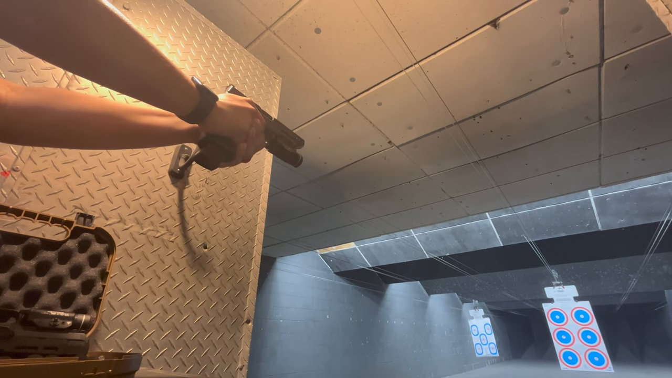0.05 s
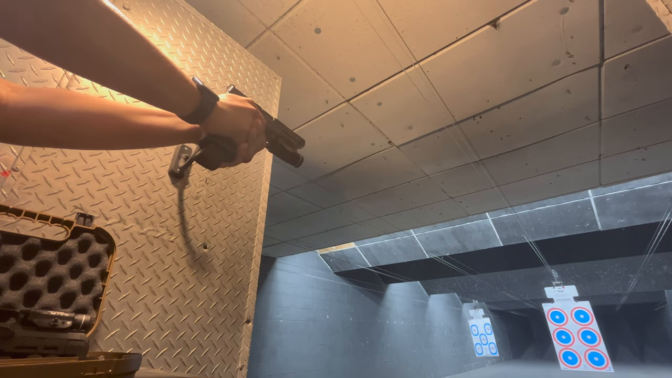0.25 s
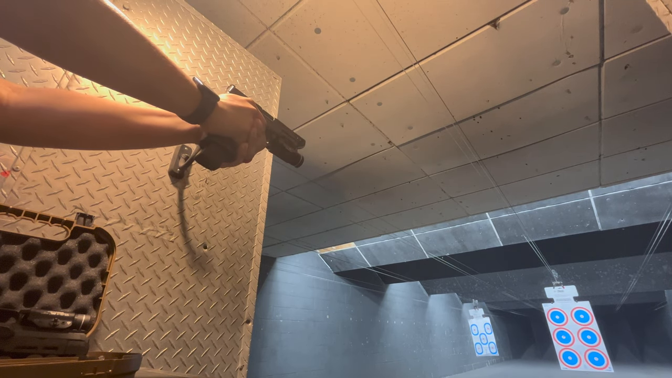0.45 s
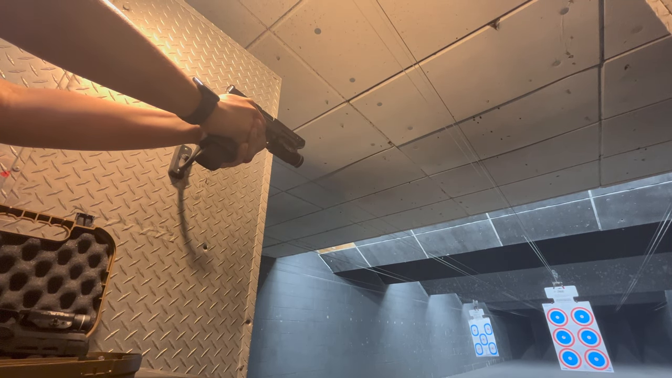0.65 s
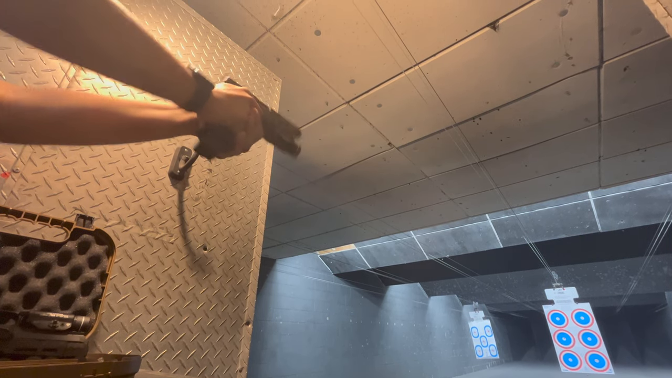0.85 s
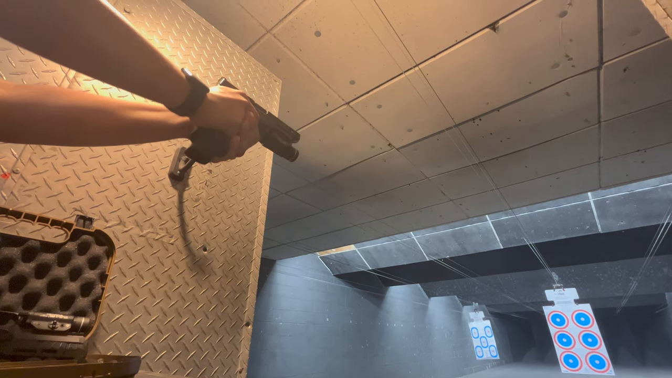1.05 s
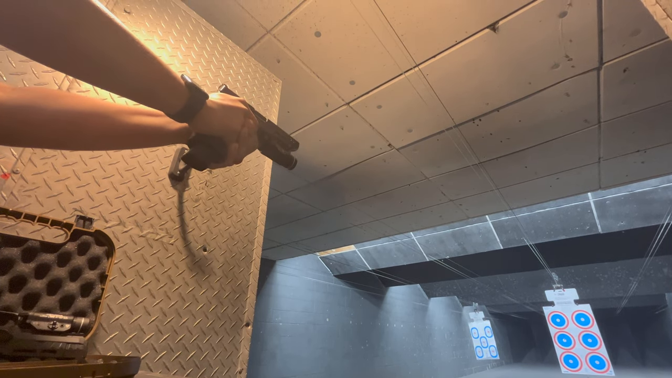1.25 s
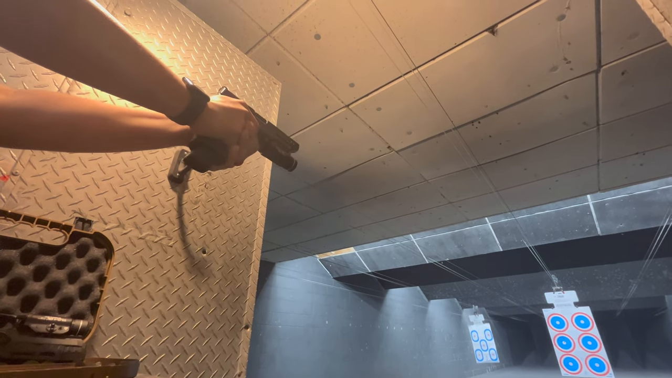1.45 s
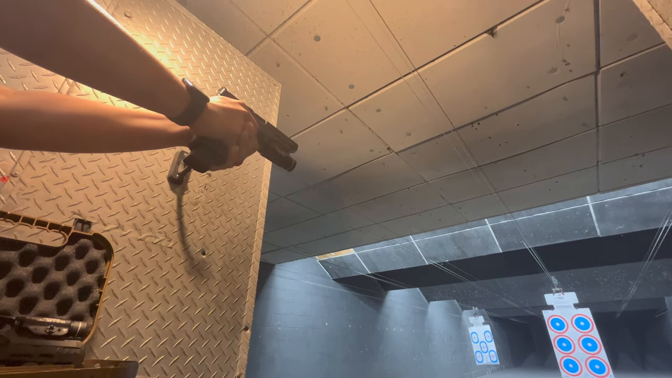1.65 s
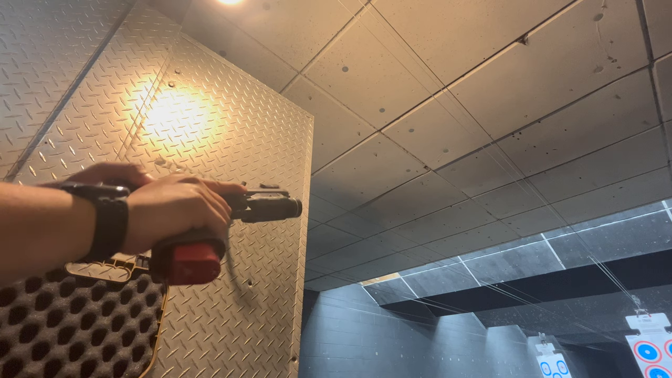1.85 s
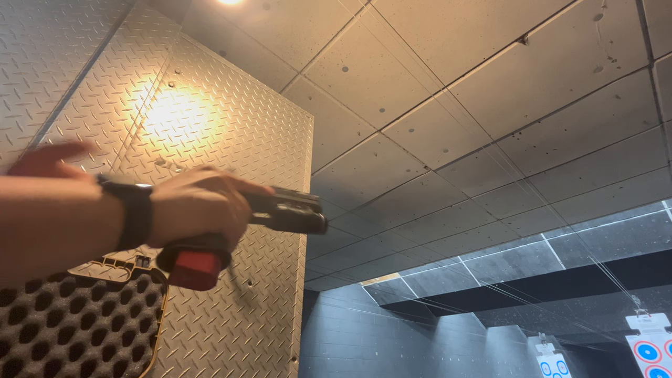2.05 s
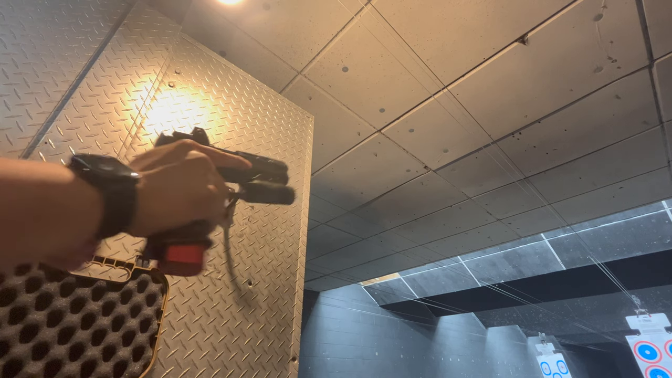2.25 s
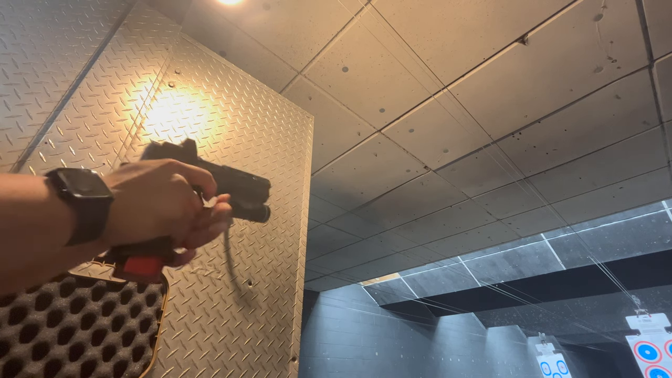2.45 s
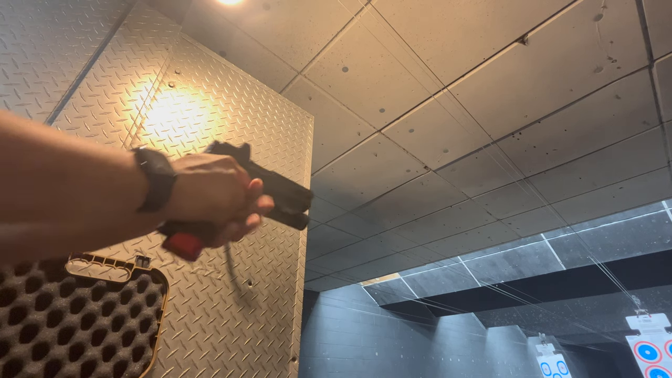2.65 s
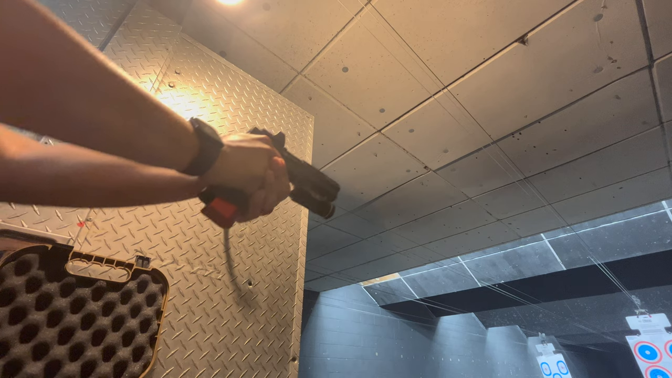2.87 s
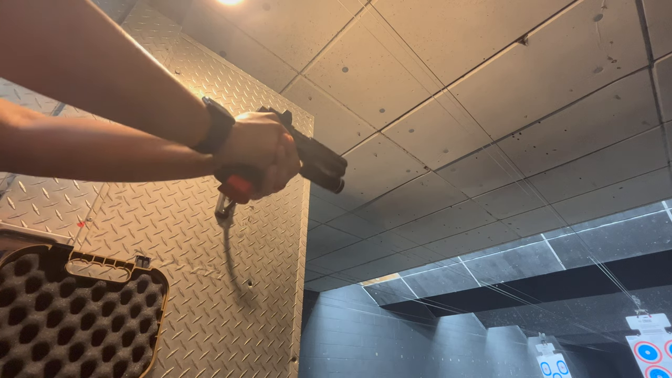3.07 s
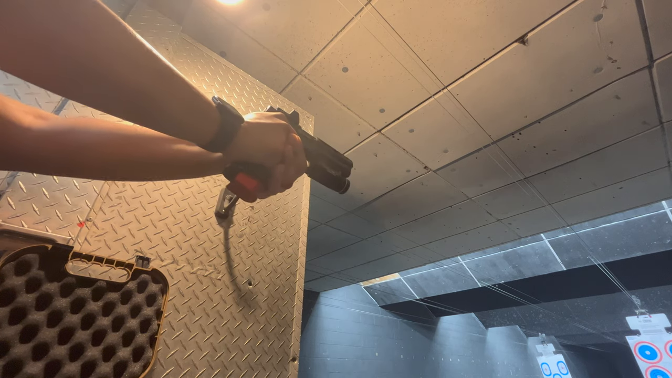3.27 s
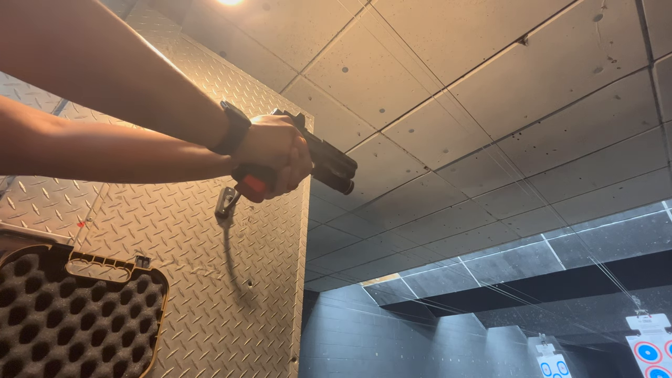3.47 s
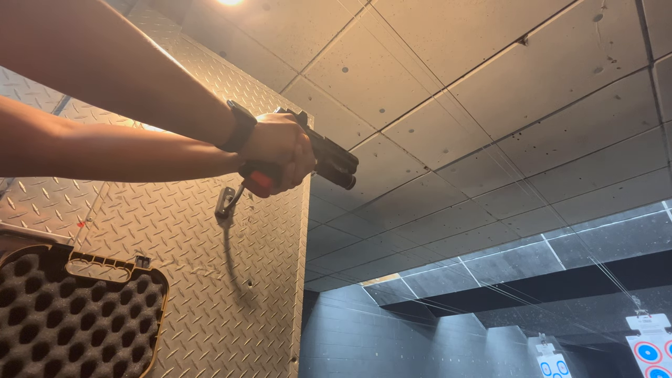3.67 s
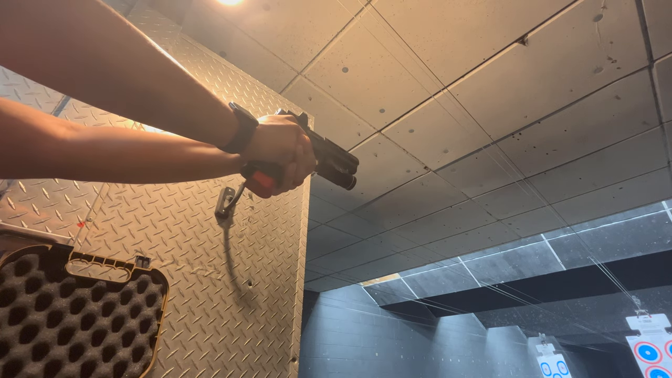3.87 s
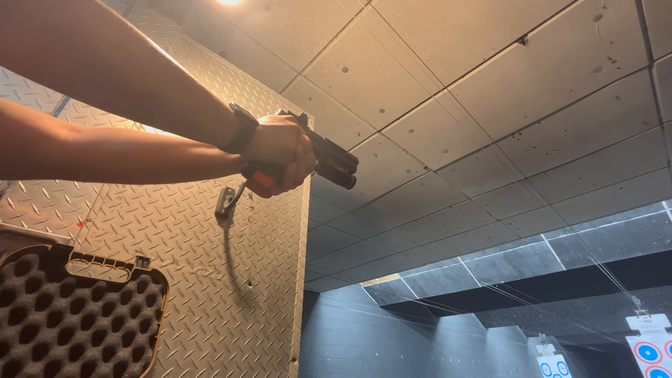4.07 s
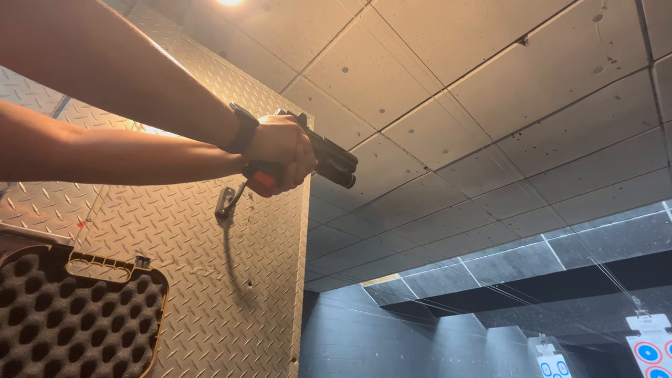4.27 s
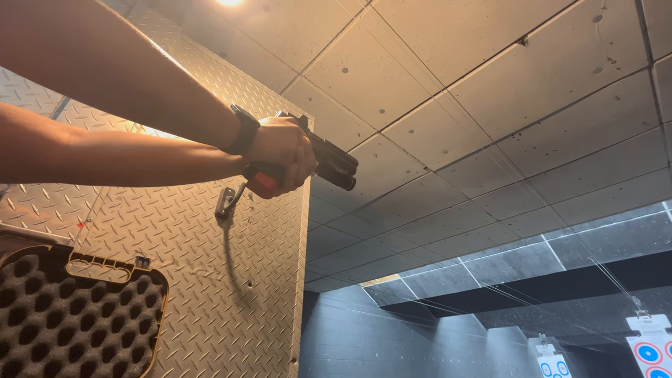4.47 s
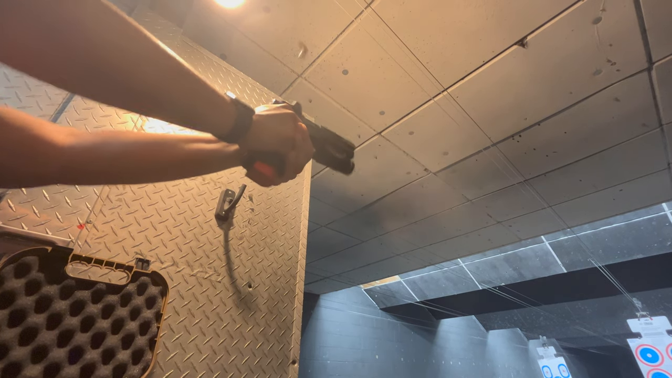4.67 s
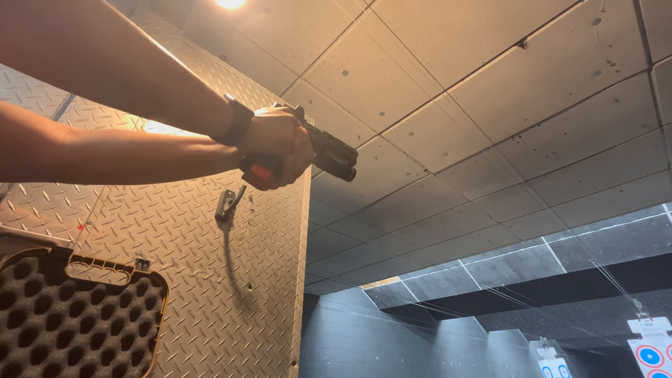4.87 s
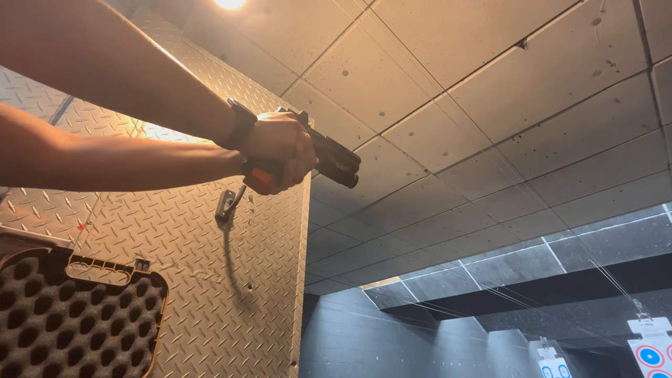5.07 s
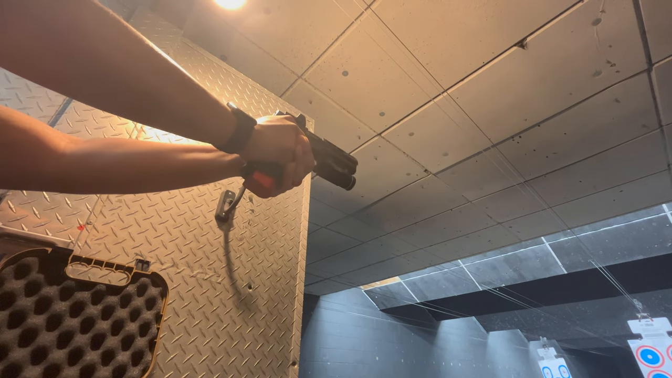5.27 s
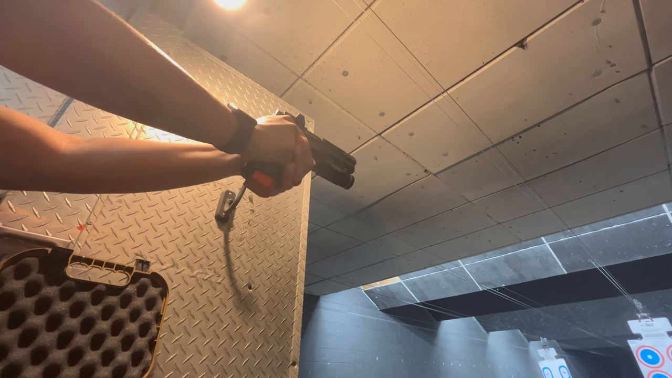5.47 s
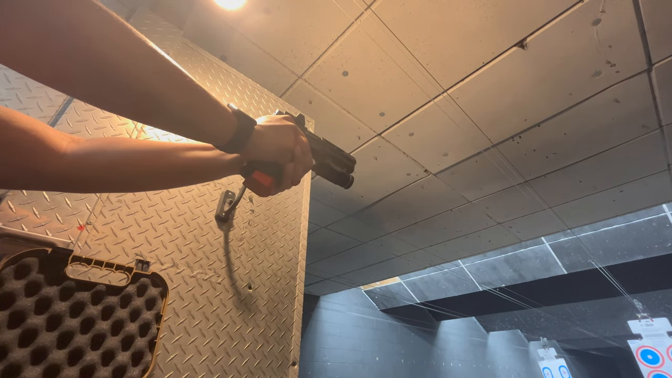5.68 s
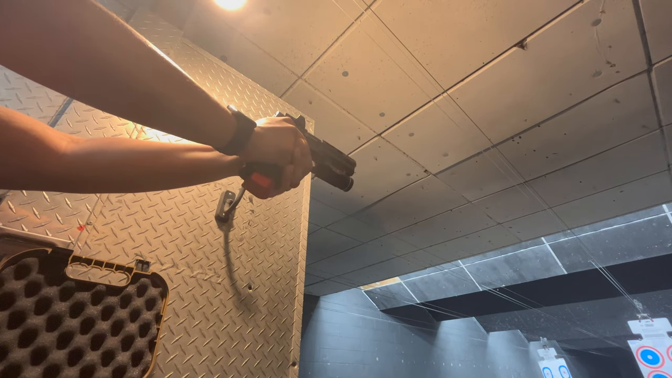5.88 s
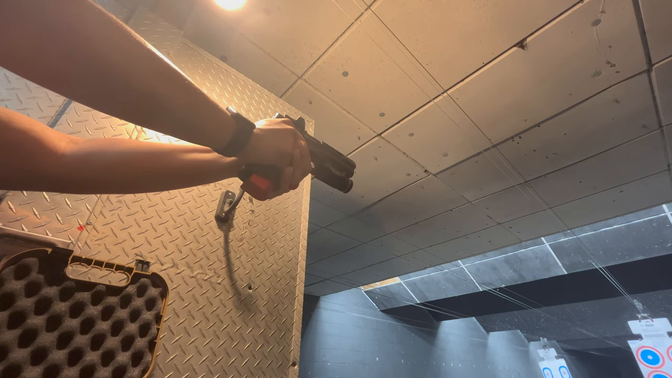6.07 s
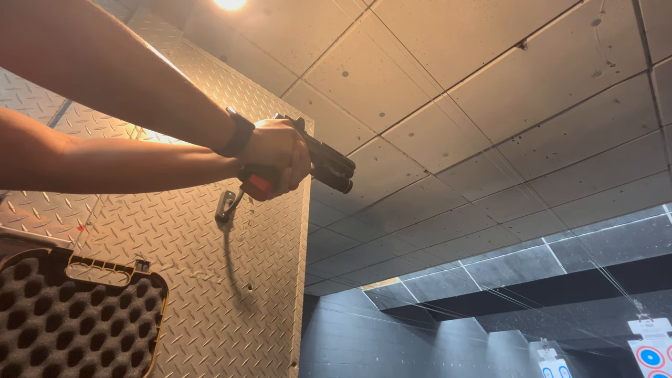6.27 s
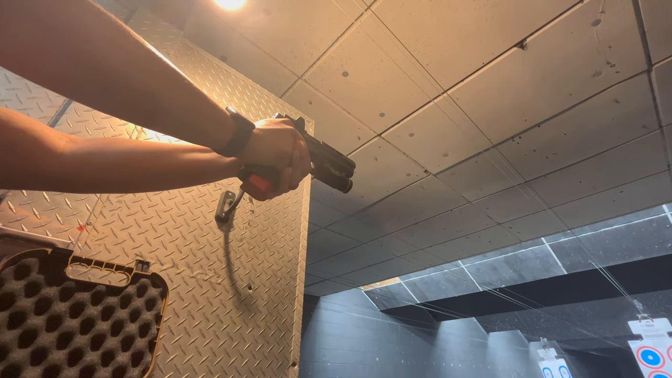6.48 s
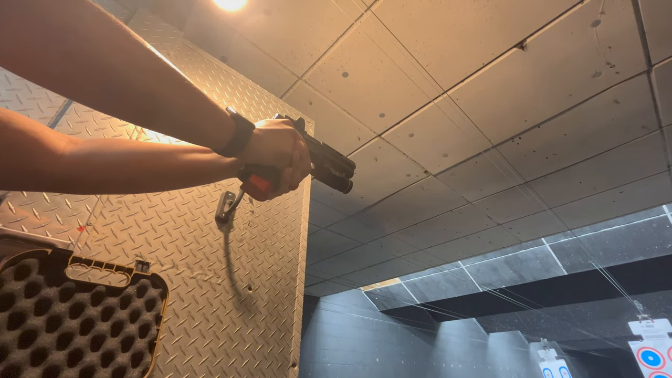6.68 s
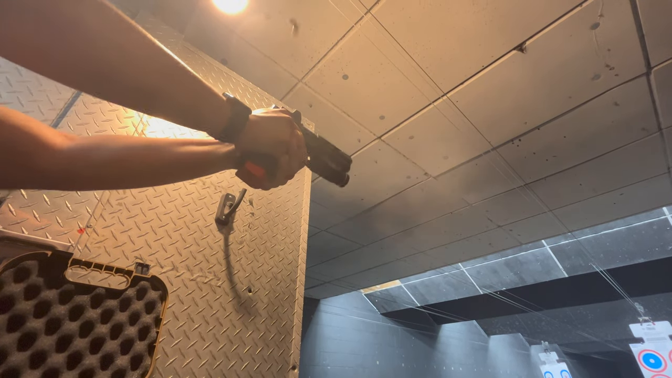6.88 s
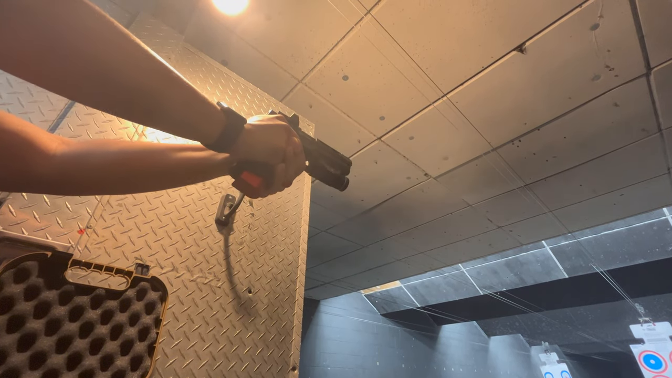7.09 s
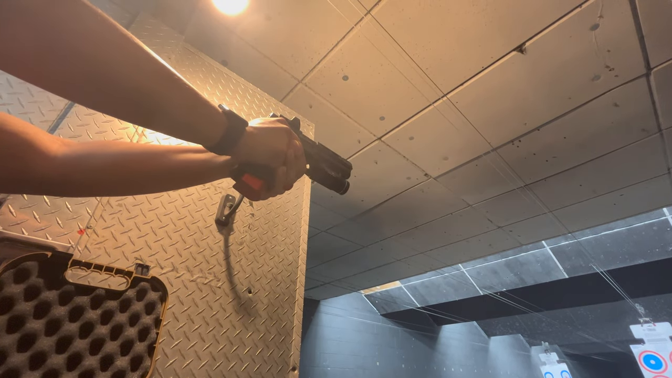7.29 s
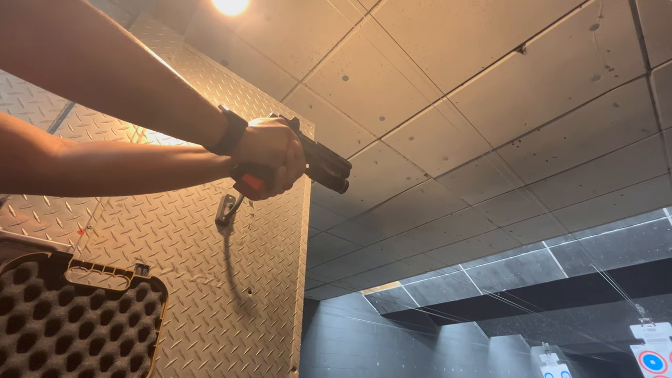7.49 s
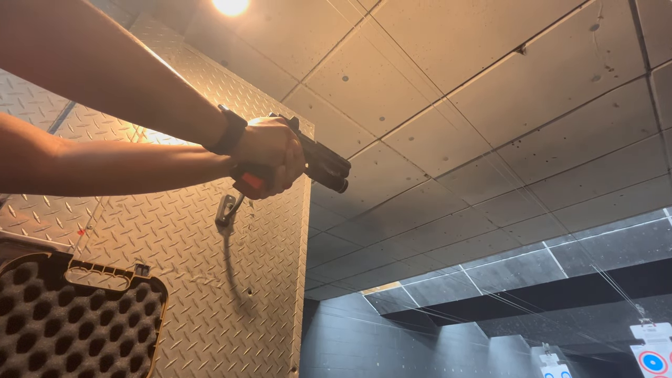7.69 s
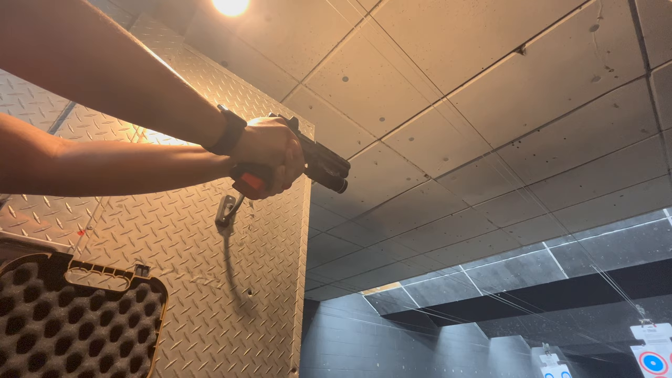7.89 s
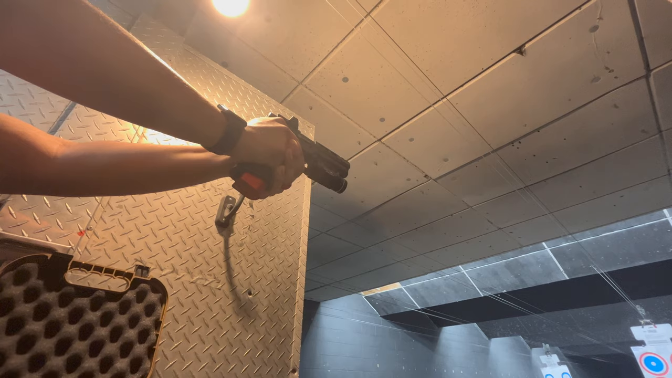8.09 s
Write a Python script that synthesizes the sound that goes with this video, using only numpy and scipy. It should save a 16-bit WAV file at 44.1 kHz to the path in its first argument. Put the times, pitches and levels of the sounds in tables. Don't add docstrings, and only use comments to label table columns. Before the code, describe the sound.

Inside a long, hard-walled shooting range, the tail of a pistol shot dies away and another shot cracks, echoing off the far end while cases land. An abrupt cut brings loud fan rush and close metallic slide racking with hand rustle. The next shot chokes off the fan, and five more follow unevenly, cases ticking on the floor. The close stereo microphone audibly changes its gain.

```python
import sys
import numpy as np
from scipy import signal
from scipy.io import wavfile

SR = 44100
rng = np.random.default_rng(int(sys.argv[2]) if len(sys.argv) > 2 else 0)


def unload_audio(sound):
    columns = np.transpose(np.atleast_2d(sound))
    steps = np.round(np.clip(columns, -1, 1) * 32767)
    wavfile.write(sys.argv[1], SR, steps.astype(np.int16))


def natural_amplitude(level_db):
    exponent = np.asarray(level_db, float) / 20
    return 10 ** exponent


N = 358974
CONTROL_STEP = 40
SCENE_CHANGE_S = 1.7162
SIDES = np.array([[1], [-1]])


def at_hz(points, hz):
    table = np.array(points)
    return np.interp(np.log(hz), np.log(table[:, 0]), table[:, 1])


def rms_one(x):
    return x / np.sqrt(np.mean(x ** 2) + 1e-20)


def coarse_time():
    return np.arange(N // CONTROL_STEP + 2) * CONTROL_STEP / SR


def full_rate(slow):
    fraction = np.arange(CONTROL_STEP) / CONTROL_STEP
    joined = slow[..., :-1, None] + np.diff(slow)[..., None] * fraction
    return joined.reshape(*slow.shape[:-1], -1)[..., :N]


def flicker(rate_hz):
    r = np.exp(-2 * np.pi * rate_hz * CONTROL_STEP / SR)
    noise = rng.standard_normal(N // CONTROL_STEP + 2002)
    return rms_one(signal.lfilter([1], [1, -2 * r, r * r], noise)[2000:])


def resonate(x, hz, width_hz):
    r = np.exp(-np.pi * width_hz / SR)
    poles = [1, -2 * r * np.cos(2 * np.pi * hz / SR), r * r]
    return signal.lfilter([(1 - r * r) / 2, 0, (r * r - 1) / 2], poles, x + 1e-18)


def bandpass(x, low_hz, high_hz):
    return signal.sosfilt(signal.butter(2, [low_hz, high_hz], "band", fs=SR, output="sos"), x)


def dying(age, t60):
    return (age >= 0) * np.exp(-np.log(1e6) * np.clip(age, 0, None) / max(t60, .001))


def since(s, t):
    return np.where((s < SCENE_CHANGE_S) & (t > SCENE_CHANGE_S), -9, t - s)


def power_per_hz(spectrum, hz):
    grid_hz = np.geomspace(25, 16000, 300)
    total = np.sum(natural_amplitude(2 * at_hz(spectrum, grid_hz)) * np.gradient(grid_hz))
    return natural_amplitude(2 * at_hz(spectrum, hz)) / total


# t/s, level/dB
GAIN_DUCKS = [(1.7165, -2.5), (1.78, -1.6), (1.96, -3)]


def recorder_gain_db(t, hz=100):
    shut_db, open_db = -45, .2
    slam_s, slam_takes_s = 4.536, .009
    duck_takes_s, recover_s, recover_takes_s = .04, 2.125, .07

    def ramp(s, takes_s):
        return np.clip((t - s) / takes_s + .5, 0, 1)

    ducked = sum(db * ramp(s, duck_takes_s) for s, db in GAIN_DUCKS)
    ducked = ducked * (1 - ramp(recover_s, recover_takes_s))
    if 450 < hz < 1900:
        ducked = ducked - 4 * (ramp(GAIN_DUCKS[-1][0], duck_takes_s) - ramp(2.31, recover_takes_s))
    shut = np.maximum(t < SCENE_CHANGE_S, ramp(slam_s + slam_takes_s / 2, slam_takes_s))
    return (open_db + ducked) * (1 - shut) + shut_db * shut


# t/s, blast level/dB, first crack level/dB, booth fill/s, hall level/dB
SHOTS = [
    (-1.3, -16, -16, .07, -27),
    (.7342, -15, -18, .09, -21),
    (4.5352, -17, -11, .11, -19.5),
    (5.2735, -15.5, -20, .035, -27.5),
    (6.4405, -18, -23, .07, -26.5),
    (6.7262, -15, -16, .1, -20.5),
    (7.4535, -19, -23, .07, -27),
    (8.0875, -16, -17, .07, -24),
]
# f/Hz, level/(dB per Hz)
BLAST_SPECTRUM = [(15, -47), (25, -17), (97, -4), (195, -10), (293, -1), (489, -6), (545, -3), (659, -10),
                  (911, -3), (2160, -14), (9320, -27), (14400, -37), (16000, -90)]
# f/Hz, level/(dB per Hz)
HALL_SPECTRUM = [(15, -47), (25, -17), (92, 0), (127, -9), (301, -4), (384, -12), (463, -5), (734, -8.5),
                 (1040, -2), (1400, -8), (5280, -21.5), (13600, -42), (16000, -80)]
# f/Hz, t60/s
HALL_T60 = [(30, .55), (60, .9), (100, 1.15), (280, 1.1), (740, 1.45), (1900, 1.48), (4500, 1.24),
            (6500, .93), (9000, .72), (14000, .42)]
# f/Hz, level re hall/dB
LATE_TAIL = [(30, -45), (400, -40), (1000, -20), (2500, -24), (5000, -29), (7000, -47), (10000, -50)]


def shot_power(hz, t, slaps):
    backstop_s = .147
    late_t60_s = 2.6
    smear_db, smear_s = -16, .021
    blast, hall = power_per_hz(BLAST_SPECTRUM, hz), power_per_hz(HALL_SPECTRUM, hz)
    t60, late = at_hz(HALL_T60, hz), natural_amplitude(2 * at_hz(LATE_TAIL, hz))
    octaves = np.log2(hz / 1000)
    crack_band = 400 < hz < 8200
    out = 0
    for s, blast_db, crack_db, fill_s, hall_db in SHOTS:
        age = since(s, t)
        echo_age = age - backstop_s
        swell = 1 - dying(age, .012 + 105.0 / hz)
        held_s = fill_s * (hz / 1000) ** -.22
        booth = natural_amplitude(2 * blast_db) / (1 + np.exp(np.clip((age - held_s) / .018, -50, 50))) * slaps
        crack = natural_amplitude(2 * (crack_db + 2.2 * octaves)) * (age < .008) * crack_band
        gate = natural_amplitude(-2 * 3.5 * (echo_age < 0))
        slap = 1 + 1.2 * dying(echo_age, .25)
        tail = dying(echo_age, t60) * slap + (echo_age < 0) + late * dying(echo_age, late_t60_s)
        colour = natural_amplitude(2 * .3 * octaves) * (age >= 0)
        smear = natural_amplitude(2 * (1.6 * crack_db + smear_db + 4.0 * octaves)) * crack_band
        smear = smear * (age > -smear_s) * (age < 0) * dying(s - t, .15)
        reverb = hall * natural_amplitude(2 * hall_db) * gate * swell * tail
        out = out + blast * smear + colour * (blast * (booth * swell + crack) + reverb)
    return out


# f/Hz, level/(dB per Hz)
FAN_SPECTRUM = [(22, -10), (45, -7), (76, -4), (105, -7), (180, -10), (250, -11), (330, -9.5), (592, -15),
                (1390, -12), (1770, -20), (2300, -24), (2900, -29), (4400, -32.5), (7000, -43),
                (10500, -56), (15500, -60)]


def fan_power(hz, t, gust):
    return natural_amplitude(2 * (-37.6 + .8 * gust + recorder_gain_db(t, hz))) * power_per_hz(FAN_SPECTRUM, hz)


# f/Hz, level/(dB per Hz)
MURMUR_SPECTRUM = [(30, -14), (55, -6), (97, -13), (250, -16), (552, -19), (1050, -11), (1500, -22),
                   (4310, -40), (7500, -53), (15000, -53)]


def murmur_power(hz):
    return natural_amplitude(2 * -73.7) * power_per_hz(MURMUR_SPECTRUM, hz)


# t/s, level/dB
RUSTLE = [(1.716, -39), (1.76, -44), (2.0, -44), (2.1, -49), (2.19, -43), (2.36, -49), (2.7, -72)]
# f/Hz, level/(dB per Hz)
RUSTLE_SPECTRUM = [(900, -25), (1600, -6), (2500, 3), (3200, -8), (4300, -1.5), (5800, -12), (9500, -17),
                   (11500, -26), (15500, -34)]


def rustle_level(t):
    level_db = np.interp(t, *np.transpose(RUSTLE), left=-150, right=-150)
    return natural_amplitude(2 * (level_db + 1.0 + 2.0 * flicker(40)))


# f/Hz, correlation
FAN_LIKENESS = [(60, 0.91), (110, 0.91), (200, 0.83), (380, 0.11), (700, -0.59), (1290, -0.14),
                (2380, 0.09), (4400, 0.0), (8120, 0.0), (15000, 0.73)]
# f/Hz, correlation
SHOT_LIKENESS = [(60, 0.76), (110, 0.65), (200, 0.2), (380, 0.08), (700, -0.5), (1290, -0.25), (2380, 0.04),
                 (4400, -0.02), (8120, -0.01), (15000, 0.68)]
# f/Hz, left-right/dB
FAN_BALANCE = [(60, .6), (200, -.6), (700, 3), (1400, 6), (3000, 5), (5000, 11.5), (7500, 9), (11000, -2.1)]
# f/Hz, left-right/dB
SHOT_BALANCE = [(45, 3), (90, .6), (180, 3), (350, -1.5), (700, 2.1), (3000, 3.5), (5000, 8.5), (12000, -4)]
# f/Hz, level/dB
FIELD_COLOUR = [(30, -2), (50, 0.1), (250, .3), (430, .5), (620, 1.8), (1000, .1), (1500, .6), (2000, .1),
                (3000, .5), (7000, 1), (12000, .1)]


def diffuse_field():
    t = coarse_time()
    hands = rustle_level(t)
    slaps = natural_amplitude(2 * (1.4 * flicker(150) + 1.1 * flicker(40)))
    gust = flicker(2.5)
    out = np.zeros((2, N))
    edges_hz = 31 * 2 ** np.arange(0, 9.1, 1 / 3)
    white = rng.standard_normal((2, 2, N))
    for k, (low_hz, high_hz) in enumerate(zip(edges_hz, edges_hz[1:])):
        mid, side = bandpass(white[k % 2], low_hz, high_hz)
        hz = np.sqrt(low_hz * high_hz)
        back = fan_power(hz, t, gust) + hands * power_per_hz(RUSTLE_SPECTRUM, hz) + murmur_power(hz)
        shots = shot_power(hz, t, slaps) * natural_amplitude(2 * 1.7 * flicker(14))
        alike = back * at_hz(FAN_LIKENESS, hz) + shots * at_hz(SHOT_LIKENESS, hz)
        alike = np.clip(alike / (back + shots), -.95, .99)
        back_lean, shot_lean = natural_amplitude(at_hz(FAN_BALANCE, hz)), natural_amplitude(at_hz(SHOT_BALANCE, hz))
        power = np.array([back * back_lean + shots * shot_lean, back / back_lean + shots / shot_lean])
        power = power * SR / 2 / (1.1 + alike) * natural_amplitude(2 * at_hz(FIELD_COLOUR, hz))
        out += full_rate(np.sqrt(power * (1 + alike))) * mid
        out += full_rate(np.sqrt(power * (1 - alike)) * SIDES) * side
    return out


# f/Hz, width/Hz, level/dB
FAN_LINES = [(24, 7, -54), (48.5, 8, -45), (72, 9, -46), (92, 10, -49), (119, 4, -47), (157, 5, -51),
             (199.3, 4, -44), (317, 6, -55), (1400, 200, -54), (2350, 350, -58), (2607, 8, -68)]
# f/Hz, width/Hz, level/dB, t60/s
RINGING_MODES = [(96.5, 4, -30, 1.0), (950, 12, -41, 2.7), (200, 10, -42, 1.2), (405, 20, -38, .9),
                 (546, 14, -36, 1.0), (1746, 60, -43, 1.7), (334, 22, -38, .8), (673, 20, -39, .8),
                 (900, 30, -37, .8), (1088, 14, -37, .9), (1250, 40, -39, .8), (1524, 20, -42, .8)]


def hums():
    t = coarse_time()
    air = rng.standard_normal(N)

    def narrow(hz, width_hz):
        return rms_one(resonate(resonate(air, hz, width_hz), hz, width_hz))

    fan = 0
    for hz, width_hz, db in FAN_LINES:
        tone = narrow(hz, width_hz)
        if width_hz < 6.5:
            tone = .4 * tone + np.sin(2 * np.pi * hz * np.arange(N) / SR)
        fan = fan + natural_amplitude(db - 1.5) * tone
    out = fan * full_rate(natural_amplitude(recorder_gain_db(t)))
    for hz, width_hz, db, t60 in RINGING_MODES:
        power = sum(natural_amplitude(2 * (shot[-1] + 21)) * dying(since(shot[0] + .045, t), t60) for shot in SHOTS)
        out += natural_amplitude(db) * full_rate(np.sqrt(power)) * narrow(hz, width_hz)
    return out + .42 * np.roll(out, SR // 60) * SIDES


# t/s, tick level/dB, tick low edge f/Hz, ring level/dB
CASES_ON_STEEL = [
    (.543, -67, 3500, -105),
    (1.1378, -30, 6800, -49),
    (1.3712, -20, 4200, -48),
]
# t/s, tick level/dB, tick low edge f/Hz, ring level/dB
CASES_ON_FLOOR = [
    (.045, -65, 4500, -100),
    (.148, -95, 8000, -84),
    (5.0005, -33.5, 5000, -62),
    (5.884, -62, 8000, -78),
    (7.1948, -27.5, 4600, -90),
    (7.992, -62, 7000, -85),
]


def cases():
    t, out = np.arange(N) / SR, np.zeros((2, N))
    steel = [(*row, .013, 10080, 6000) for row in CASES_ON_STEEL]
    floor = [(*row, .05, 10780, 0) for row in CASES_ON_FLOOR]
    for s, tick_db, low_hz, ring_db, t60, ring_hz, extra_hz in steel + floor:
        i = slice(round(s * SR), round(s * SR) + SR // 2)
        age = since(s, t[i])
        mid, side = rng.standard_normal((2, SR // 2))[:, :len(age)]
        tick = (mid + .85 * side * SIDES) * np.sqrt(dying(age, t60) + natural_amplitude(-2 * 30) * dying(age, .15))
        tick = bandpass(tick, low_hz, min(2.0 * low_hz + extra_hz, 15000))
        spin = 1 + .3 * np.cos(2 * np.pi * 28 * age)
        ring = np.sin(2 * np.pi * ring_hz * age) * np.sqrt(dying(age, .27)) * spin
        out[:, i] += natural_amplitude(tick_db) * tick + natural_amplitude(ring_db) * ring
    age = t - 1.375
    thump_cycles = 58 * age + 1.1 * (1 - dying(age, .07))
    thump = np.sin(2 * np.pi * thump_cycles) * np.sqrt(dying(age, .2))
    return out + natural_amplitude(-33 + np.array([[-4], [3]])) * thump


# t/s, length/s, level/dB, low knock level/dB
SLIDE_CONTACTS = [(1.7165, .02, -33.5, -7), (1.7600, .009, -17, -12), (1.7725, .005, -18, 1),
                  (1.781, .02, -35.5, -1.5), (1.830, .006, -38, -1), (1.928, .008, -32, -14),
                  (1.9385, .004, -19, -9), (1.943, .011, -24, -9), (1.954, .011, -18, -10),
                  (1.9685, .004, -18, -14), (1.978, .006, -27, -1), (1.987, .02, -40, -3),
                  (2.585, .015, -51, -12)]
# t/s, level/dB
SETTLING_TICKS = [
    (1.883, -43),
    (2.19, -55),
    (2.631, -52),
    (3.132, -58),
]
# f/Hz, width/Hz, level/dB
SLIDE_BODY = [(2250, 450, 2), (3100, 500, -3), (4600, 900, 3), (6800, 1500, -3), (9200, 2000, -1)]
# f/Hz, left-right/dB
SLIDE_BALANCE = [(700, 9), (1400, 1.5), (2500, 9), (5000, 7), (7000, 4), (11000, -2.1)]


def slide():
    thud_hz, knock_hz, rasp_hz = 800, 1400, 13000
    t, first, span = np.arange(SR // 5) / SR, round(SCENE_CHANGE_S * SR), 2 * SR
    slips_per_s = 14000
    slips = rng.standard_normal((2, span)) * natural_amplitude(2.0 * np.minimum(rng.exponential(1, span), 4))
    slips = slips * (rng.random(span) < slips_per_s / SR)
    slips = rms_one(slips[0] + .95 * slips[1] * SIDES)
    body, knock, rasp = np.zeros((3, 2, span))
    strokes = [(*row, -1 + 1.4 * min(row[2] + 22, 0)) for row in SLIDE_CONTACTS]
    ticks = [(s, .004, db, -12, .1) for s, db in SETTLING_TICKS]
    for s, length_s, db, knock_db, rasp_db in strokes + ticks:
        start = round(s * SR) - first
        i = slice(start, start + len(t))
        contact = (t < length_s) + dying(t - length_s, .008)
        buzz = natural_amplitude(-2 * 14) * dying(t - length_s, .12)
        touch = slips[:, i] * natural_amplitude(db) * np.sqrt(contact + buzz)
        body[:, i] += touch
        knock[:, i] += touch * natural_amplitude(knock_db)
        rasp[:, i] += slips[:, i] * np.sqrt(contact) * natural_amplitude(db + rasp_db)

    def lean(hz):
        return natural_amplitude(at_hz(SLIDE_BALANCE, hz) / 2 * SIDES)

    out = sum(natural_amplitude(db + 8) * lean(hz) * resonate(body, hz, width_hz) for hz, width_hz, db in SLIDE_BODY)
    out = out + natural_amplitude(19.5) * lean(knock_hz) * resonate(knock, knock_hz, 260)
    out = out + natural_amplitude(9) * lean(thud_hz) * resonate(knock, thud_hz, 300)
    out = out + natural_amplitude(8.5) * lean(rasp_hz) * resonate(resonate(rasp, rasp_hz, 5000), rasp_hz, 7000)
    echo_age = np.arange(SR // 2) / SR - .003
    echo = rng.standard_normal((2, SR // 2)) * np.sqrt(dying(echo_age, .4))
    echo = signal.sosfilt(signal.butter(2, 6500, fs=SR, output="sos"), echo)
    out = out * natural_amplitude(-1.8) + natural_amplitude(-50) * signal.fftconvolve(out, echo, axes=1)[:, :span]
    return np.pad(out, ((0, 0), (first, N - first - span)))


def scene():
    return diffuse_field() + hums() + cases() + slide()


def band_limit(x):
    return signal.sosfilt(signal.butter(12, 16650, fs=SR, output="sos"), x)


def record(dry):
    soft = 1.1 * np.tanh(dry / 1.1)
    mix = signal.sosfilt(signal.cheby2(12, 27, 15200, fs=SR, output="sos"), soft)
    return band_limit(mix)


dry = scene()
out = record(dry)
unload_audio(out)
```